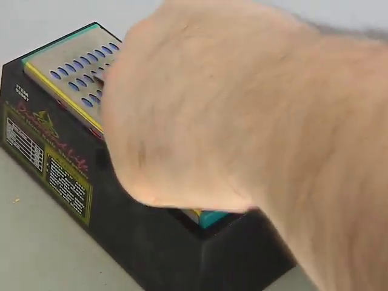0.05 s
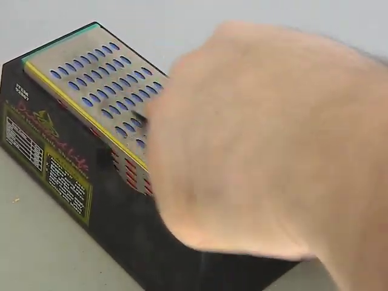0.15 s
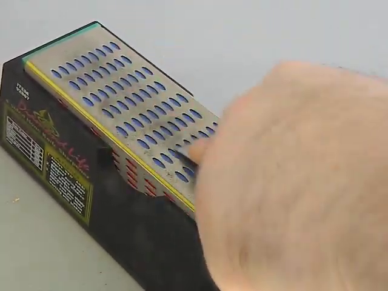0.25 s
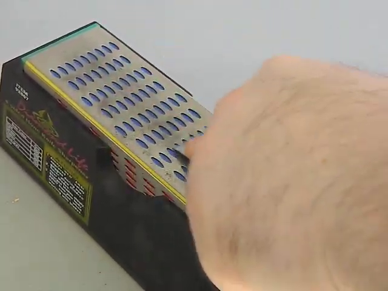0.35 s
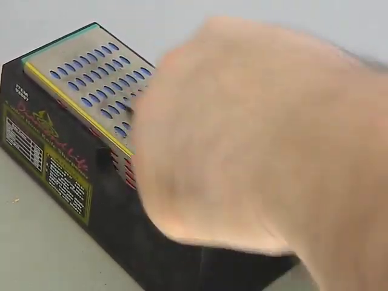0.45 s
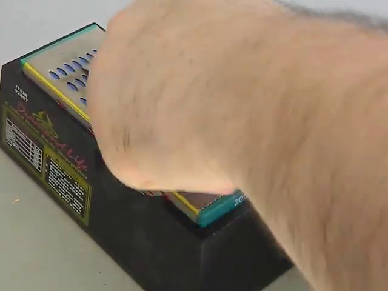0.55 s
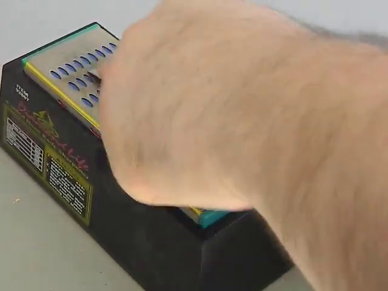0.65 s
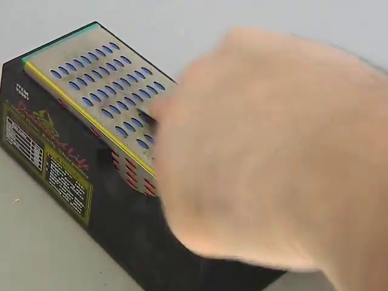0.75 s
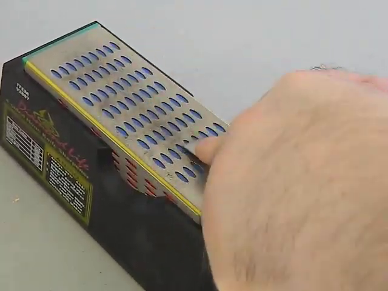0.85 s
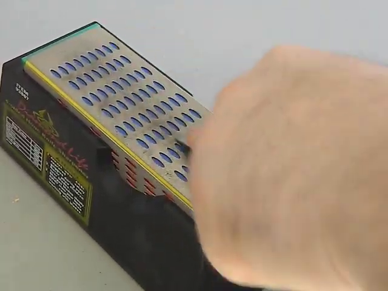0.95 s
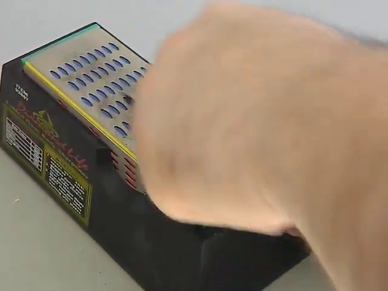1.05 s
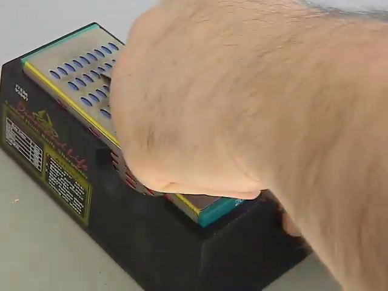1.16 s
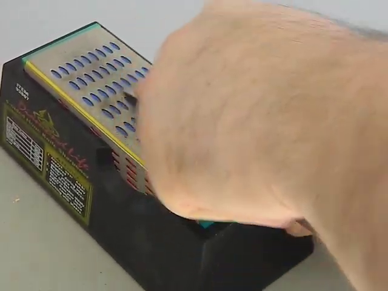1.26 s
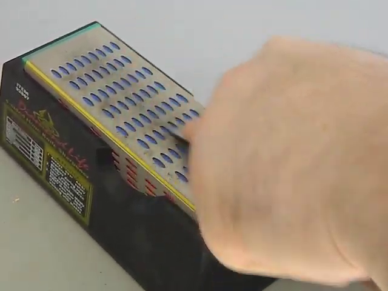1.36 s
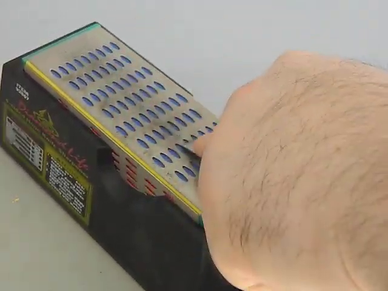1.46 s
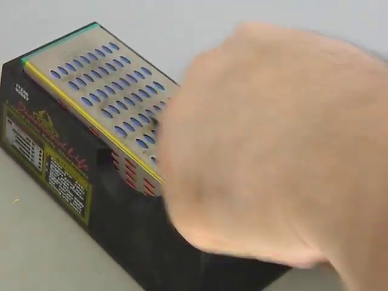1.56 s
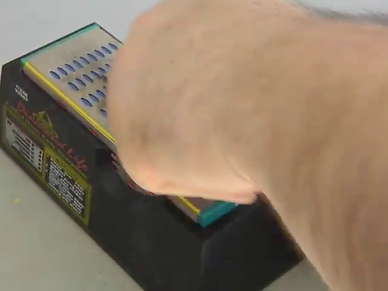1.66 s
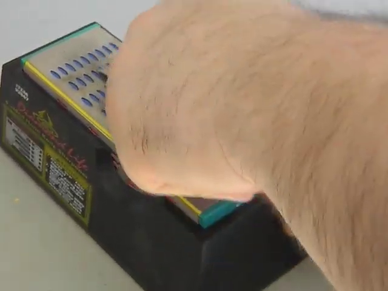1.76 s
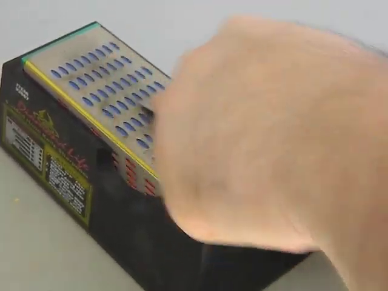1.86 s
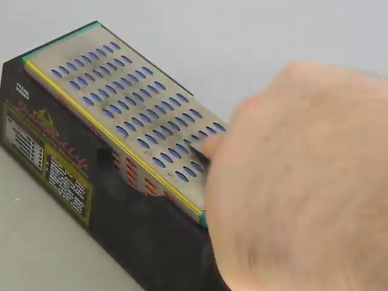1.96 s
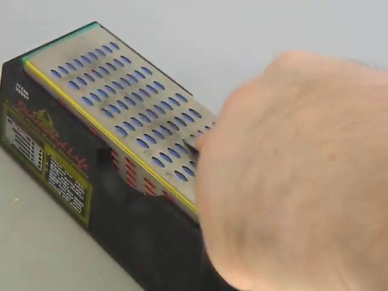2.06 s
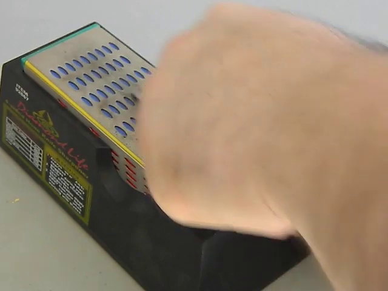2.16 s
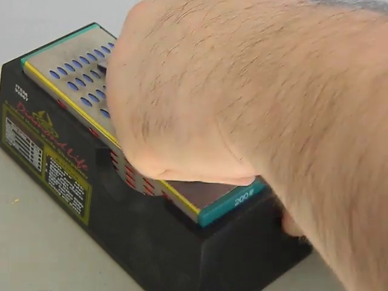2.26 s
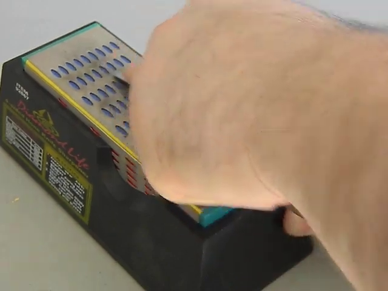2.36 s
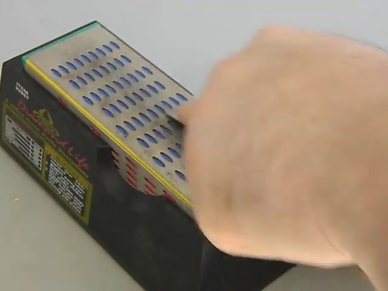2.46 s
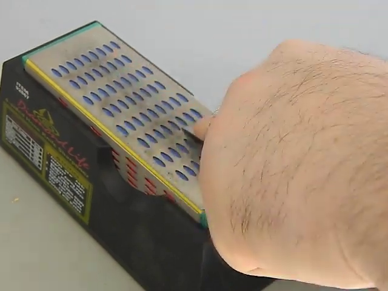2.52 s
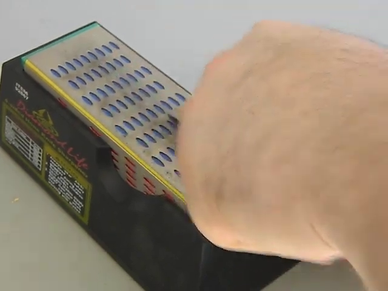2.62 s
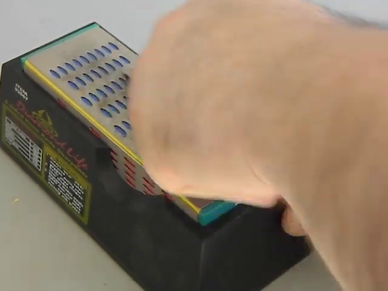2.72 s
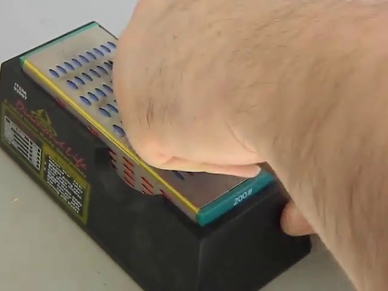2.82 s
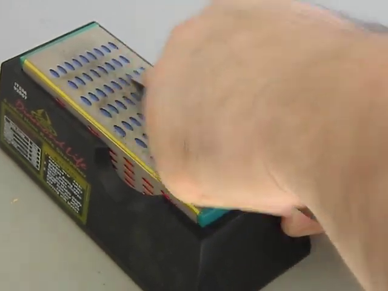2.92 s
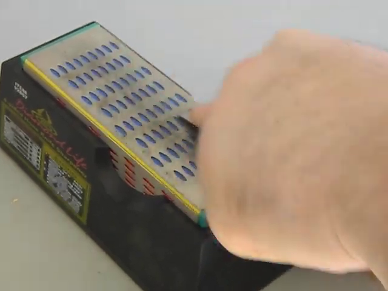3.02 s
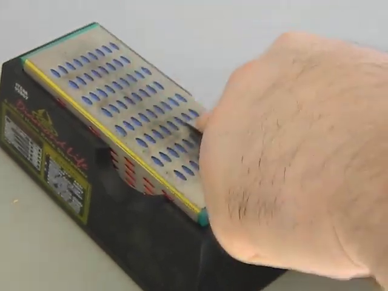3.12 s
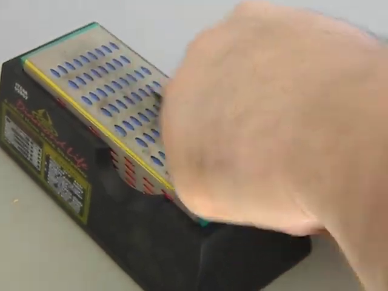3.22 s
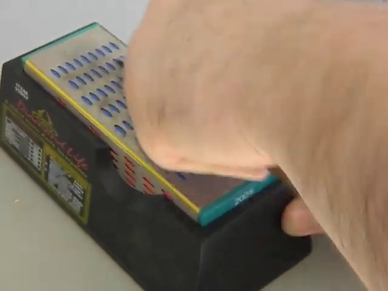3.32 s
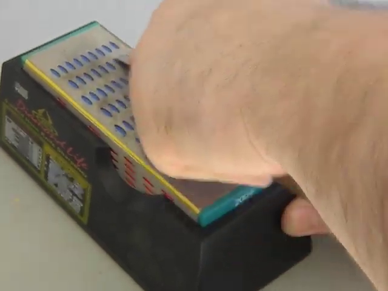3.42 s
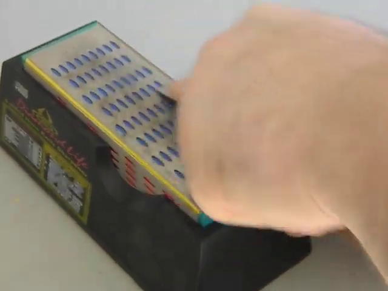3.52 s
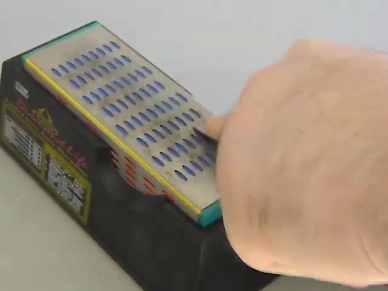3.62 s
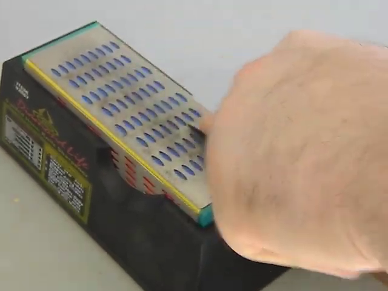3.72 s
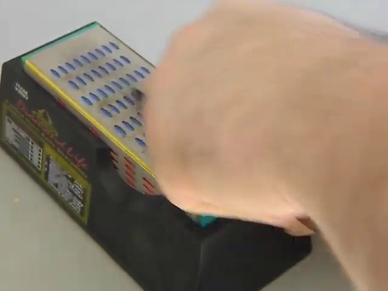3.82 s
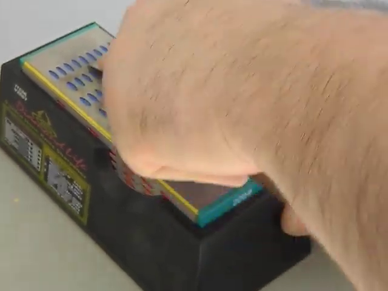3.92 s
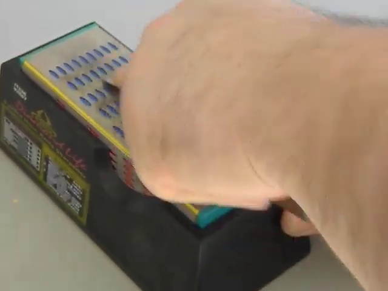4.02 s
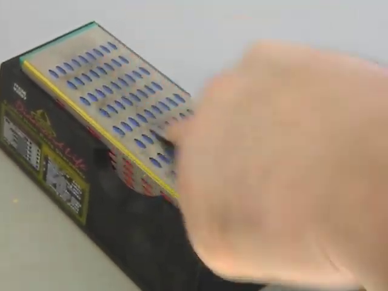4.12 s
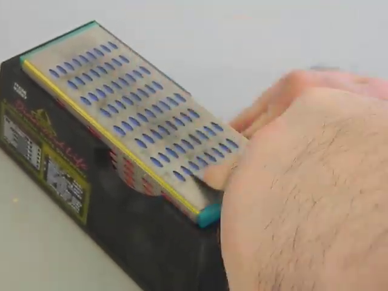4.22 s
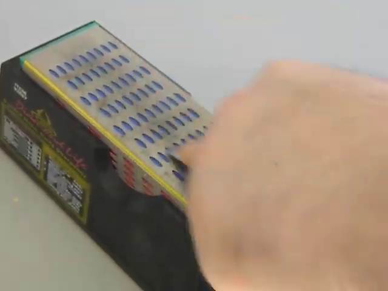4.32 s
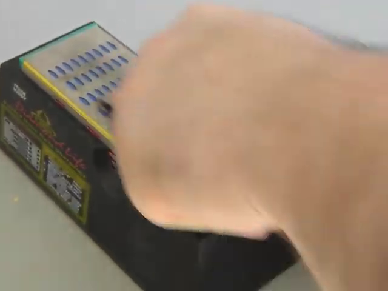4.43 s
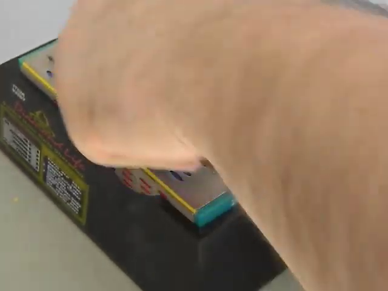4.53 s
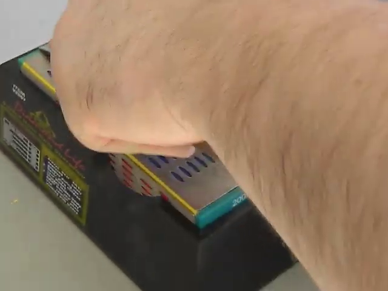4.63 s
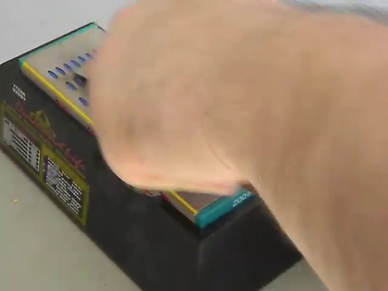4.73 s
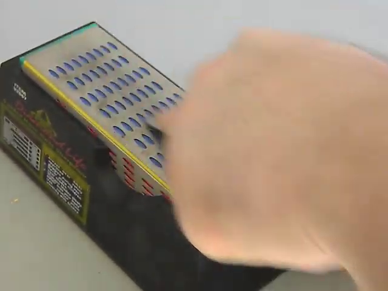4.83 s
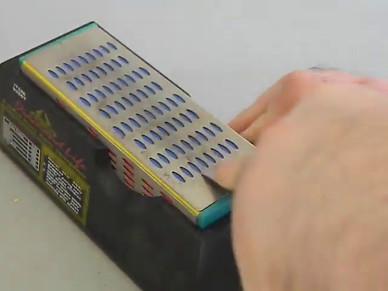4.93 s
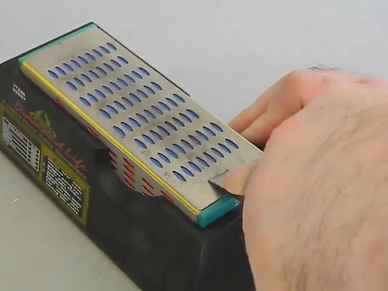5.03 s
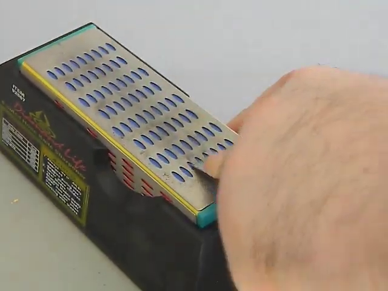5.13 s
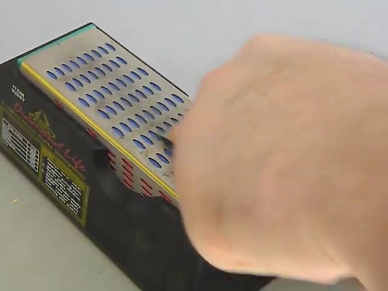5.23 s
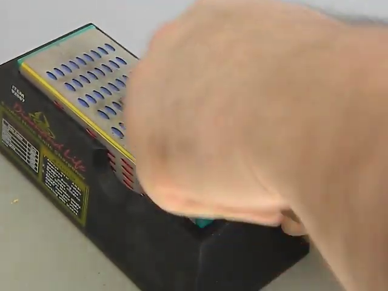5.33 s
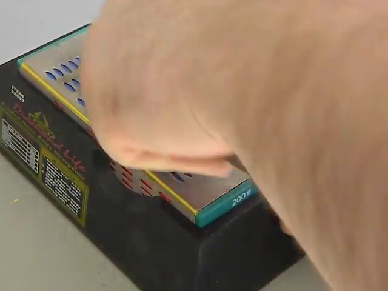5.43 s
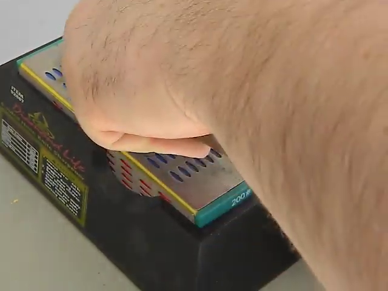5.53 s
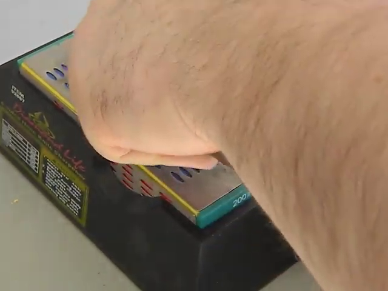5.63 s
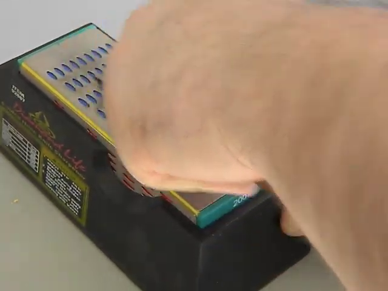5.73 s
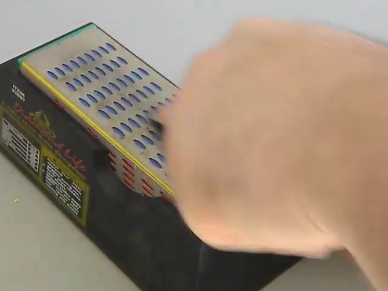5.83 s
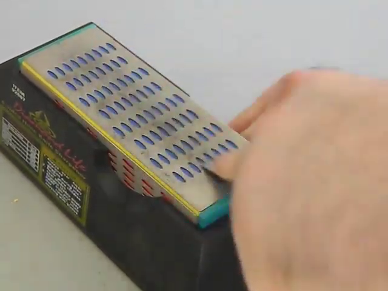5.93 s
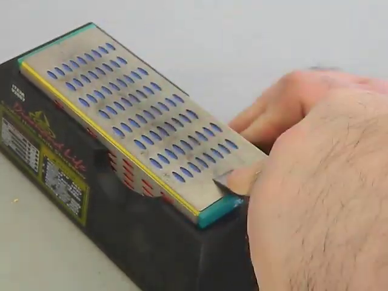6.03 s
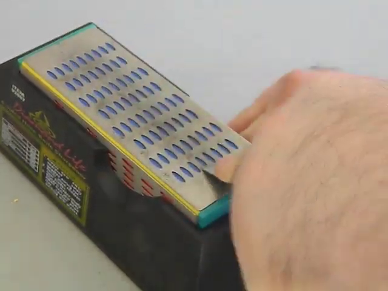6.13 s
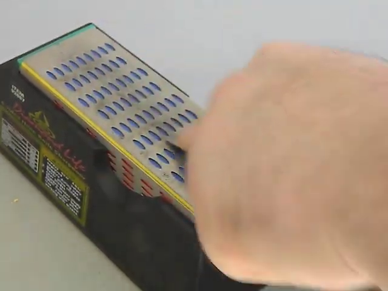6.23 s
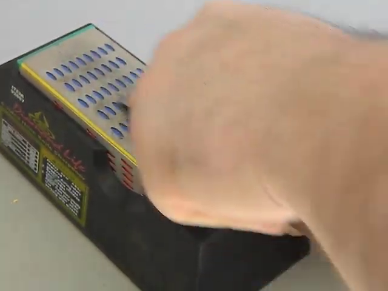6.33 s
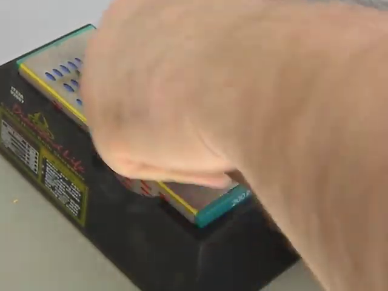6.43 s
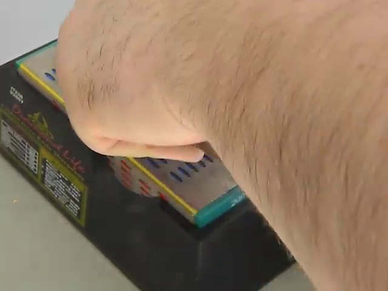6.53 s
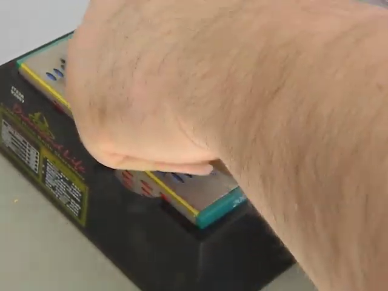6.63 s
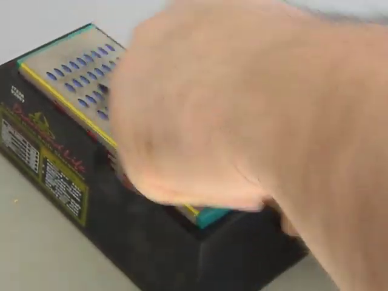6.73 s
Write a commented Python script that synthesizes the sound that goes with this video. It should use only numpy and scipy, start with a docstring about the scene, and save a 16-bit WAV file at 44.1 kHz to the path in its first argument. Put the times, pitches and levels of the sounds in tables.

```python
"""Chisel on a diamond plate

At a workbench, close to the microphone, a steel chisel is pushed and pulled along a coarse diamond plate
on a hollow box. The edge snaps over thousands of grits a second, the more the faster it moves, and nearly
rests at each turn. One stream of random snaps rings the plate and the blade (coloured noise tails, narrow
rings) and, harder on the push, drums the box and the bench (tuned modes). A short, dull room surrounds it."""
import sys
import numpy as np
from scipy import signal
from scipy.fft import rfft, irfft
from scipy.io import wavfile
from scipy.ndimage import uniform_filter1d

SR = 44100
rng = np.random.default_rng(int(sys.argv[2]) if len(sys.argv) > 2 else 0)


def persist_wave(psi):
    """Save psi, clipped to +-1, as 16-bit WAV."""
    counts = np.round(np.clip(psi, -1, 1) * 32767).astype(np.int16)
    wavfile.write(sys.argv[1], SR, np.atleast_2d(counts).T)


N = 298645
T = np.arange(N) / SR


def undb(db):
    """Turn decibels into gain."""
    return 10 ** (np.asarray(db) / 20)


def unit(x):
    """Scale to rms 1."""
    return x / np.sqrt(np.mean(x ** 2))


def gains(points):
    """Draw a gain curve over all frequencies through (f/Hz, level/dB) points, straight in log frequency."""
    hz, db = np.transpose(points)
    bins_hz = np.fft.rfftfreq(N, 1 / SR)
    return undb(np.interp(np.log(bins_hz + 1), np.log(hz), db))


def colour(x, points):
    """Filter with a smooth spectrum."""
    return irfft(rfft(x) * gains(points), N)


def ring(snaps, modes):
    """Drive sharply tuned modes; each snap lands elsewhere and pushes each mode in its own sense."""
    out = 0
    for hz, width, db in modes:
        b, a = signal.iirpeak(hz, hz / width, fs=SR)
        kicks = snaps * rng.choice([-1, 1], N)
        once = signal.lfilter(b, a, kicks)
        twice = signal.lfilter(b, a, once)  # steeper skirts around the mode
        out = out + undb(db) * twice
    return unit(out)


def tail(t60, size=4096):
    """Answer like countless overlapping modes: noise of unit energy that decays 60 dB in t60 seconds."""
    decay = np.exp(-np.log(1000) * np.arange(size) / SR / t60)
    h = rng.standard_normal(size) * decay
    return h / np.sqrt(np.sum(h ** 2))


def along_plate(x, place, t60, count=18):
    """Give each spot of the plate its own tail, so the timbre shifts as the edge travels."""
    out = 0
    for k in range(count):
        distance = abs(place * (count - 1) - k)  # in spots
        nearness = np.cos(np.pi / 2 * np.clip(distance, 0, 1))
        out = out + signal.oaconvolve(x * nearness, tail(t60))[:N]
    return out


def drive(pushing, pressure_db, place, speed, push_db, pull_db, far_db, pressure_power, speed_power):
    """Set the gain of one part by the hand's direction, pressure, place and speed."""
    direction_db = pushing * push_db + (1 - pushing) * pull_db
    db = direction_db + far_db * (place - .5) + pressure_power * pressure_db
    return undb(db) * speed ** speed_power


# Strokes along the plate, push and pull in turn, each ending where the next begins:
# start t/s, pressure level/dB, pressure rise over the stroke/dB, extra blade hiss level/dB,
# extra box and bench thrum level/dB
HAND_STROKES = [(-.25, 2.5, 3, -5, 8.5), (0.048, -0.5, -4.5, -2.5, .5), (.347, 2, 1.5, -1, 0.5),
                (0.638, 1.5, -5, -3, 1), (.93, -0.5, -1, -0.5, 1.5), (1.203, -2.5, -2, -1, 0.5),
                (1.485, 1.5, -3, -1, 1), (1.759, -2.5, 3, 0, 1.5), (2.038, -1.5, 0.5, .5, 0),
                (2.318, -3.5, -6, 2, 0), (2.588, 0.2, -3.5, 0, -1.5), (2.866, -2, -5.5, 2.5, -0.5),
                (3.137, 1.6, -1, -1, -.5), (3.42, 0.5, -6, 2.5, 0), (3.708, 3, -1.5, 1.5, -1),
                (3.98, 1, -4.5, 0.5, -1), (4.282, 4.5, -3.5, -1.5, -1.5), (4.645, -0.5, -8.5, 1, -1.5),
                (5.057, -4.5, -10.5, 1, -0.5), (5.617, -4.5, 7, 2.5, .5), (6.076, -2.2, -4, -.5, -1),
                (6.612, -5.5, -9, -1.5, -1)]
LAST_TURN_S = 7.0
REGRIP_S = 0.065  # the hand changes its grip over this time at each turn


def stroke(creep, hold):
    """Move the hand: stroke count, place (0 near, 1 far) and speed, steady mid-stroke, never quite nil."""
    turns = [row[0] for row in HAND_STROKES] + [LAST_TURN_S]
    progress = np.interp(T, turns, np.arange(len(turns)))
    angle = np.pi * progress
    pace = np.tanh(hold * np.sin(angle)) / np.tanh(hold)
    place = (1 - np.cos(angle)) / 2
    return progress, place, np.hypot(pace, creep)


def grip(progress):
    """Set direction (1 push, 0 pull), pressure, hiss and thrum anew at each turn; pressure ramps between."""
    number = np.minimum(progress.astype(int), len(HAND_STROKES) - 1)
    _, pressure_db, rise_db, hiss_db, thrum_db = np.array(HAND_STROKES)[number].T
    pushing = 1. - number % 2
    ramped_db = pressure_db + rise_db * (progress - number - .5)
    held = np.array([pushing, ramped_db, hiss_db, thrum_db])
    return uniform_filter1d(held, int(REGRIP_S * SR), axis=1)


def grit(speed, snaps_per_s, size_db, catch_per_s, catch_db):
    """Snap the edge over single diamonds; the snaps swell where it catches and slips. Rates at speed 1."""
    hit = rng.random(N) < snaps_per_s * speed / SR
    spread = np.clip(rng.standard_normal(N), -2, 2)
    sizes = rng.choice([-1, 1], N) * undb(size_db * spread)
    travel = np.cumsum(speed) / SR
    catches = np.interp(travel * catch_per_s, np.arange(N), rng.standard_normal(N))
    # the root of speed evens out the loudness, so that each part can follow speed in its own way
    return unit(hit * sizes * undb(catch_db * catches) / np.sqrt(speed))


# Moments when the edge digs in: t/s, time for the dB change to ebb to 1/e/s, extra rasp level/dB,
# extra push on box and bench level/dB
EDGE_DIGS = [(0.656, 0.013, 8.5, -2), (0.976, 0.013, 4.5, 3), (1.114, .02, -1, 2.5), (2.096, 0.011, 4, 6),
             (2.235, 0.011, -1, 9), (3.162, 0.013, 5.5, 1), (3.813, 0.0092, 5, 9), (4.31, 0.063, 0.5, 5),
             (4.411, .01, 5.5, 2), (5, 0.0073, 0, 9.5), (6.423, 0.072, 4.5, 6)]


def digs():
    """Gains of rasp and push: they jump when the edge digs in and ebb as the steel shears off."""
    total_db = 0
    for start, length, *db in EDGE_DIGS:
        since = np.maximum(T - start, 0)
        ebb = (T >= start) * np.exp(-(since / length) ** 2)
        total_db = total_db + np.outer(db, ebb)
    return undb(total_db)


# Slow modes of the workbench: f/Hz, width of one filter pass/Hz, relative level/dB
BENCH_MODES = [(72, 15.6, -1.6), (103, 16, -16), (119.15, 12.1, 2), (131.8, 13, -0.3), (156.9, 20, -1),
               (190.8, 18.8, -2.5), (229.7, 13.6, -5.5)]
# How the bench answers the hand: push and pull level/dB, near-to-far gain/dB, powers of pressure and speed
BENCH_ANSWER = dict(push_db=-21.5, pull_db=-27.5, far_db=4, pressure_power=0.27, speed_power=0.47)


def bench_thrum(push, hand):
    """The heavy bench under the box hums in its low modes and follows speed the least."""
    return ring(push, BENCH_MODES) * drive(*hand, **BENCH_ANSWER)


# Modes of the hollow box: f/Hz, width of one filter pass/Hz, relative level/dB
BOX_MODES = [(272.5, 31, -13.5), (328.5, 34, -9.5), (361, 17, 0.2), (374.2, 17, -0.5), (404.8, 26, -6),
             (426.9, 22, .5), (465.2, 50, -11), (538.5, 55, -16.5), (603, 25, -15)]
# How the box answers the hand: push and pull level/dB, near-to-far gain/dB, powers of pressure and speed
BOX_ANSWER = dict(push_db=-22, pull_db=-25.5, far_db=1, pressure_power=0.38, speed_power=0.97)


def box_drum(push, hand):
    """The hollow box under the plate drums in its own modes, harder on the push."""
    return ring(push, BOX_MODES) * drive(*hand, **BOX_ANSWER)


# Colour of the plate: f/Hz, relative level/dB
PLATE_COLOUR = [(250, -39), (480, 0.9), (650, -0.5), (780, -0.5), (920, -2), (1070, -0.4), (1500, -3),
                (1900, -3.5), (2250, -5.8), (3000, -8.5), (3650, -12), (4200, -19), (9000, -44)]
# Narrow rings of the plate: f/Hz, width of one filter pass/Hz, relative level/dB
PLATE_MODES = [(688, 20, -3.5), (843.5, 44, -0.5), (1041, 51, 2.5), (1094, 26, 0.5), (1165.5, 19, 2),
               (1203, 17, -5.5), (1342, 13, -7.5), (1341, 32, -9.5), (1930, 44, -3.5)]
# How the plate answers the hand: push and pull level/dB, near-to-far gain/dB, powers of pressure and speed
PLATE_ANSWER = dict(push_db=-21.5, pull_db=-22.5, far_db=0.5, pressure_power=0.84, speed_power=0.95)


def plate_rasp(rasp, place, hand):
    """The plate rasps with a tail that changes from spot to spot, plus a few narrow rings."""
    struck = along_plate(rasp, place, t60=0.055) + 0.81 * rasp
    body = undb(-4.5) * unit(colour(struck, PLATE_COLOUR))
    rings = undb(-10.5) * ring(rasp, PLATE_MODES)
    return (body + rings) * drive(*hand, **PLATE_ANSWER)


# Colour of the blade: f/Hz, relative level/dB
BLADE_COLOUR = [(700, -23), (1500, 1.5), (2250, -1.3), (3100, 1.8), (3650, -1.1), (4100, -4.5),
                (4800, -1.2), (5900, -5), (6700, -2.5), (7800, -8), (9300, -10), (11800, -7), (13500, -12),
                (15700, -16.5)]
# How the blade answers the hand: push and pull level/dB, near-to-far gain/dB, powers of pressure and speed
BLADE_ANSWER = dict(push_db=-31, pull_db=-29, far_db=-0.2, pressure_power=1, speed_power=1.5)


def blade_hiss(rasp, place, hand, hiss_db):
    """The fist damps the light blade, so its hiss is drier than the rasp; it follows speed the most."""
    struck = along_plate(rasp, place, t60=0.047) + 1.17 * rasp
    hiss = unit(colour(struck, BLADE_COLOUR))
    return hiss * undb(hiss_db) * drive(*hand, **BLADE_ANSWER)


# Balance at the close microphone: f/Hz, left minus right level/dB
LEFT_OVER_RIGHT = [(60, 4), (120, 3), (220, -0.5), (700, -.8), (1400, -2), (2500, -2.5), (3500, -.5),
                   (4600, 3), (5900, 5.5), (7000, 2.5), (9000, 0.5), (15000, 1.8)]
# Scatter at the close microphone: f/Hz, scattered over direct level/dB
SCATTER = [(50, -8), (130, -12), (350, -20.5), (700, -18.5), (1400, -17), (2800, -9), (5500, -5),
           (10000, -3), (15000, -5)]


def microphone(x, place, scatter_t60):
    """Add to the direct sound what bench and moving arm scatter, opposite in sense left and right."""
    side = colour(along_plate(x, place, scatter_t60), SCATTER)
    lean = np.sqrt(gains(LEFT_OVER_RIGHT))
    return irfft(rfft([x + side, x - side]) * np.array([lean, 1 / lean]), N)


def workshop(x, wet_db, t60):
    """Short, dull reverberation, unrelated left and right; it lingers into each turn."""
    wet = np.array([signal.oaconvolve(x, tail(t60, size=16384))[:N] for _ in range(2)])
    dull = signal.butter(1, 5000, fs=SR, output="sos")
    return undb(wet_db) * signal.sosfilt(dull, wet)


# Colour of the quiet workshop air: f/Hz, relative level/dB
AIR_COLOUR = [(20, -2), (40, -1), (100, -9), (300, -16), (1500, -16), (15000, -32)]


def workshop_air():
    """A faint, steady noise bed, weighted to the lows and unrelated left and right."""
    return undb(-48) * unit(colour(rng.standard_normal((2, N)), AIR_COLOUR))


def scene():
    """One stream of snaps drives bench, box, plate and blade; the lighter the part, the more it follows speed."""
    progress, place, speed = stroke(creep=.19, hold=.8)
    pushing, pressure_db, hiss_db, thrum_db = grip(progress)
    hand = pushing, pressure_db, place, speed
    snaps = grit(speed, snaps_per_s=16000, size_db=3.5, catch_per_s=1000, catch_db=1.24)
    rasp, push = snaps * digs()
    thrum = (bench_thrum(push, hand) + box_drum(push, hand)) * undb(thrum_db)
    scrape = thrum + plate_rasp(rasp, place, hand) + blade_hiss(rasp, place, hand, hiss_db)
    close = microphone(scrape, place, scatter_t60=0.053)
    room = workshop(scrape, wet_db=-16, t60=0.36)
    return close + room + workshop_air()


def record(dry):
    """The recorder cuts the top steeply above 15650 Hz."""
    return signal.sosfilt(signal.ellip(10, .1, 80, 15650, fs=SR, output="sos"), dry)


dry = scene()
out = record(dry)
persist_wave(out)
```